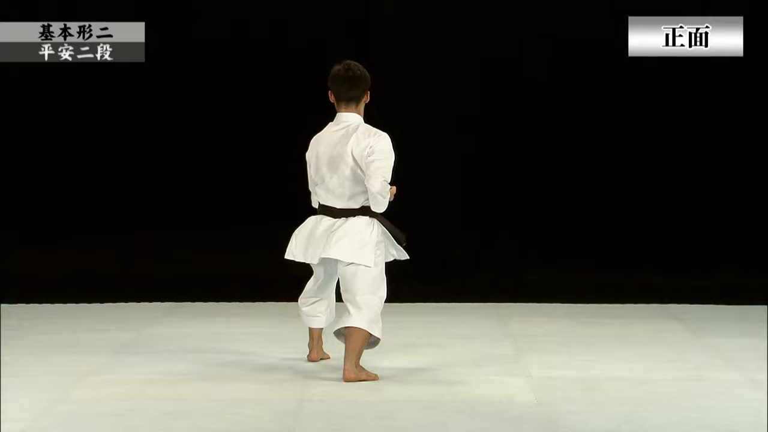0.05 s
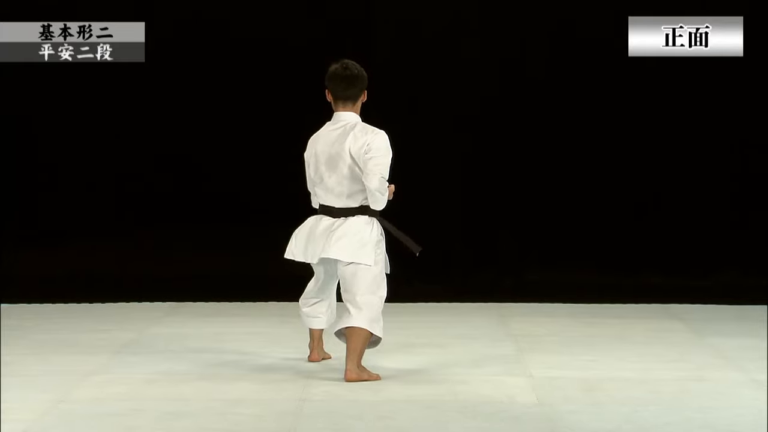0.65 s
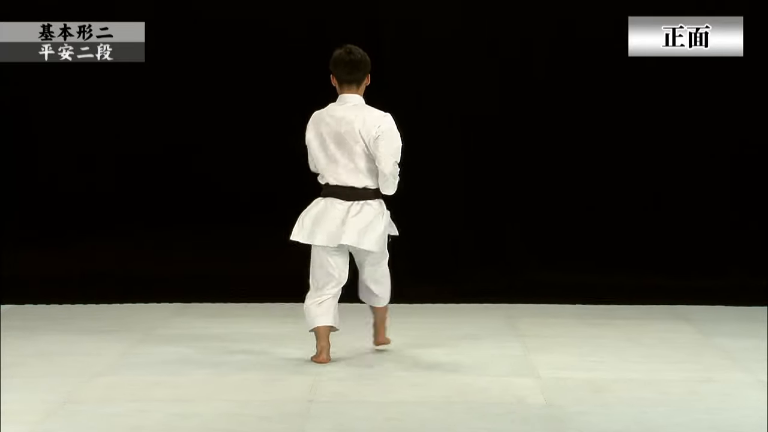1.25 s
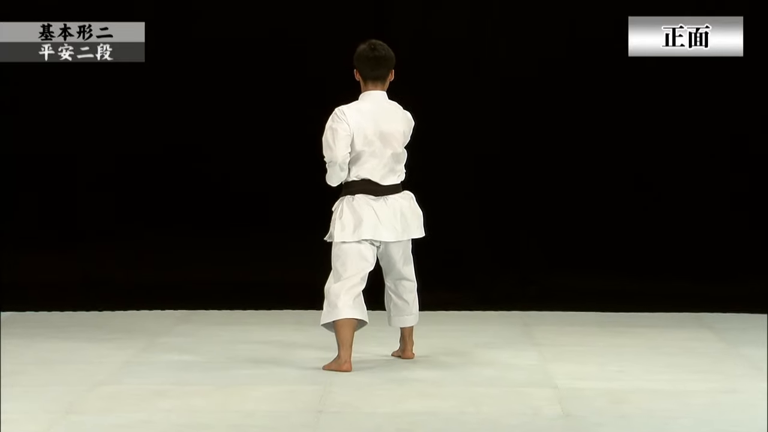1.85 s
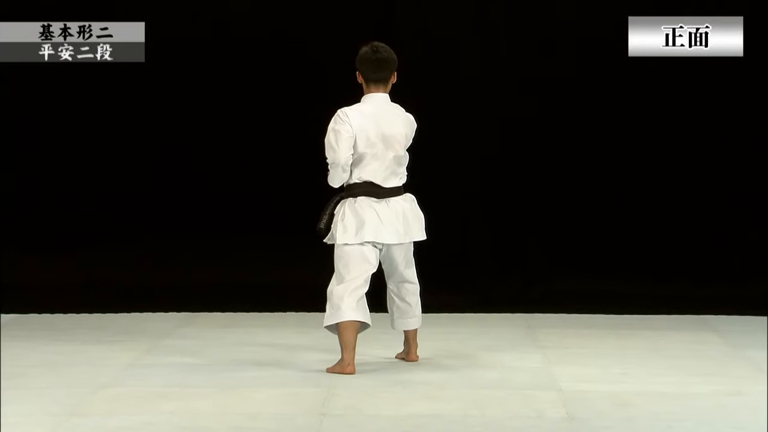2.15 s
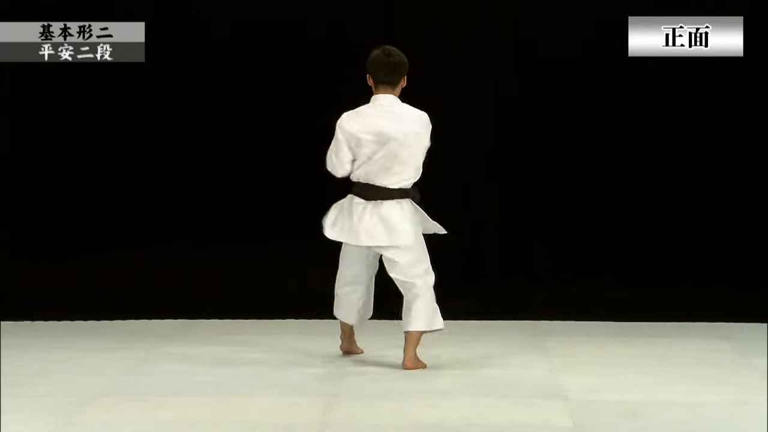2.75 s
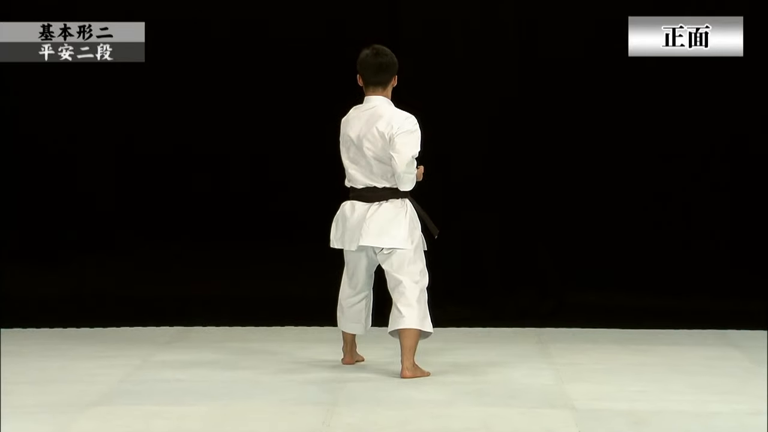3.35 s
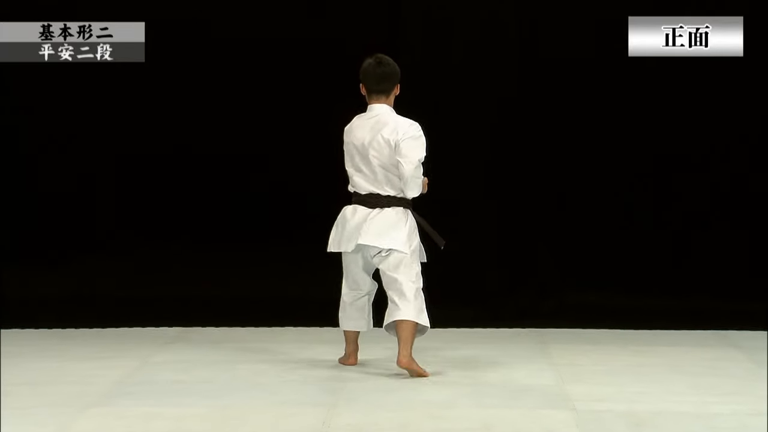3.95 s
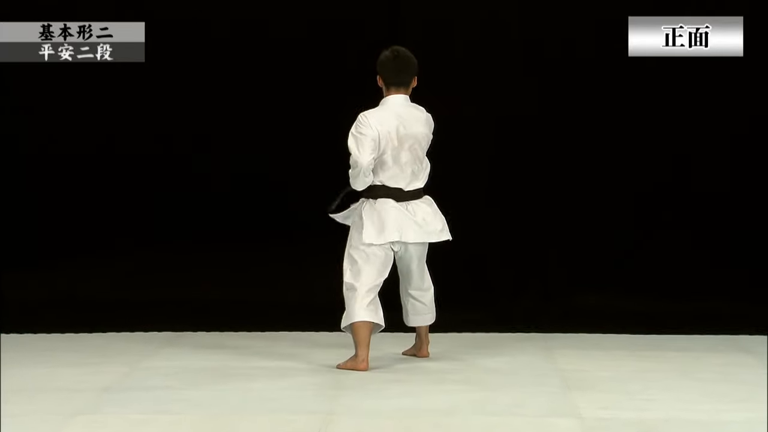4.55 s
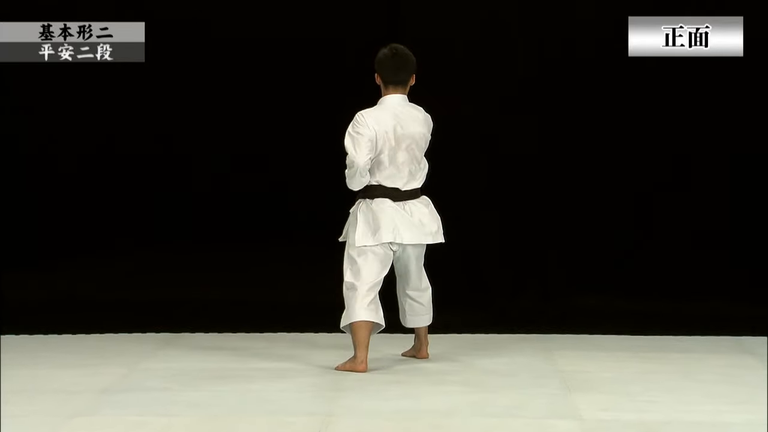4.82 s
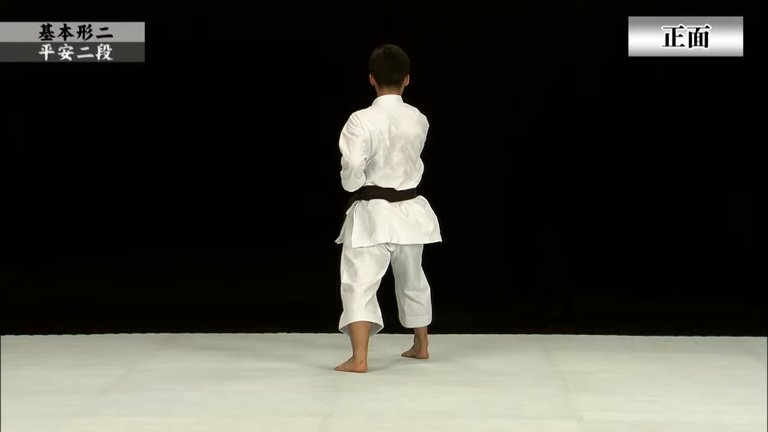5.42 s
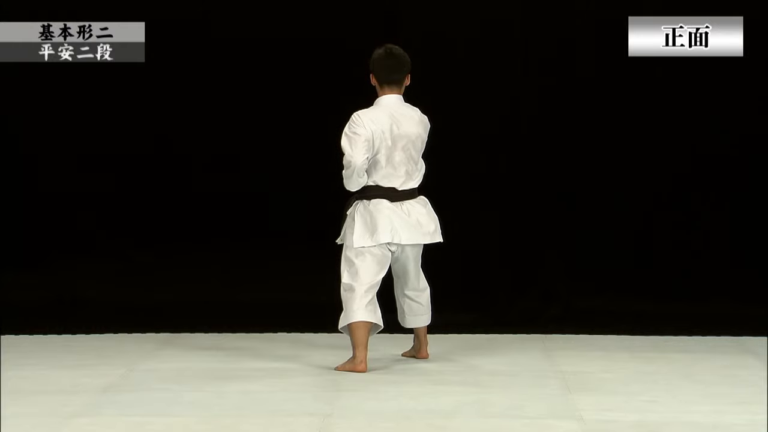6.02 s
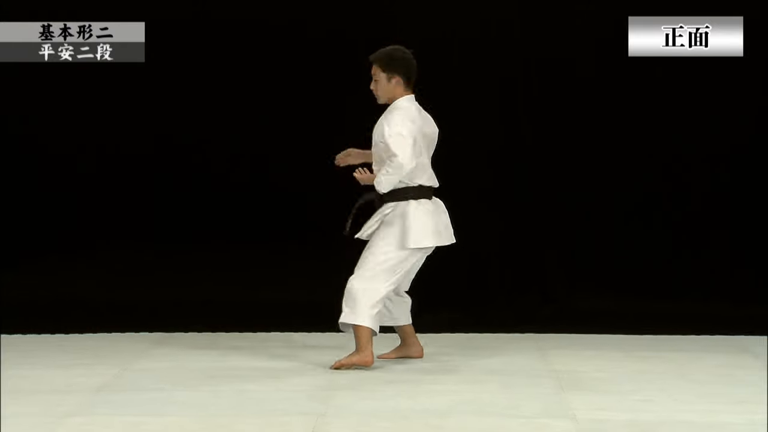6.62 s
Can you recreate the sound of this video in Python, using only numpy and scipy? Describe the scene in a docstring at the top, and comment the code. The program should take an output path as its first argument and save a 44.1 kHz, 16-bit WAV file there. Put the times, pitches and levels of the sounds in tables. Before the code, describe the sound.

A heavy cotton karate uniform swishes and snaps as bare feet step and thud on a padded mat in a quiet hall.

```python
"""A heavy cotton karate uniform swishes, flaps and cracks taut as its barefoot wearer steps and changes
stance three times, then starts a fourth move. Folds buckle in soft pops, the weave hisses as it rubs
and loose cloth flumps with trapped air. The soles thud, brush, squeak, slide and creak on a padded
floor that rings low. The quiet hall answers briefly; ventilation and a faint electrical hum fill
the pauses."""
import sys
import numpy as np
from scipy import signal
from scipy.fft import rfft, irfft, next_fast_len
from scipy.io import wavfile
from scipy.ndimage import map_coordinates

SR = 44100
rng = np.random.default_rng(int(sys.argv[2]) if len(sys.argv) > 2 else 0)


def to_wav(s):
    """Save 16-bit WAV."""
    ch = np.atleast_2d(s).T  # columns
    pcm = np.round(np.clip(ch, -1, 1) * 32767)  # PCM
    wavfile.write(sys.argv[1], SR, pcm.astype(np.int16))


N = 294588

# tone colour of a fold cracking taut: f/multiple of the fold's pitch, level/dB
CRACK_SPECTRUM = [(.04, -36), (.12, -8), (.35, -9.5), (.7, 4), (1, 5.5), (1.4, -2.5), (2.2, -10), (4, -23),
                  (9, -34), (20, -44.5)]


def amp(db):
    """Decibels to gain."""
    return np.exp(np.asarray(db) * (np.log(10) / 20))


def unit(x):
    """Scale to rms 1."""
    return x / np.sqrt(np.mean(x ** 2) + 1e-20)


def along(points, hz):
    """Read (f/Hz, value) points on a log frequency axis."""
    f, v = np.transpose(points)
    return np.interp(np.log(hz + 1), np.log(f + 1), v)


def stroke(rows):
    """Cycles elapsed and gain of a short gliding contact, silent outside its span."""
    times, hz, db = np.transpose(rows)
    t = np.arange(N) / SR
    touching = (t > times[0]) & (t < times[-1])
    cycles = np.cumsum(np.interp(t, times, hz) * touching) / SR
    return cycles, amp(np.interp(t, times, db)) * touching


def wobble(rate):
    """A smooth random curve, rate knots a second."""
    knots = rng.standard_normal(int(N * rate / SR) + 4)
    return map_coordinates(knots, [np.arange(N) * rate / SR])


def coloured(x, spectrum, size=8192):
    """x through a causal filter of unit energy with the given spectrum."""
    cepstrum = irfft(np.log(amp(along(spectrum, np.fft.rfftfreq(size, 1 / SR)))))
    cepstrum[1:size // 2] *= 2  # minimum phase keeps attacks sharp
    cepstrum[size // 2 + 1:] = 0
    response = irfft(np.exp(rfft(cepstrum)))
    return signal.fftconvolve(x, response / np.linalg.norm(response))[:N]


def noise(spectrum):
    """Coloured noise of rms 1."""
    return unit(coloured(rng.standard_normal(N), spectrum))


def grains(rate, spread_db):
    """Random tiny impulses of uneven size, rms 1."""
    chance, size = rng.random(N), rng.standard_normal(N)
    impulses = (chance < rate / SR) * rng.choice([-1, 1], N)
    return unit(impulses * amp(spread_db * np.clip(size, -2, 2)))


def puff(spectrum, t60, size=4096):
    """A dying burst of coloured noise that starts at about rms 1."""
    t = np.arange(size) / SR
    colour = amp(along(spectrum, np.fft.rfftfreq(size, 1 / SR)))
    fall = amp(-60 * t / t60)
    burst = irfft(rfft(rng.standard_normal(size)) * colour) * fall
    return burst * np.linalg.norm(fall) / np.linalg.norm(burst)


def gesture(start, length, rise, grow, fall):
    """Envelope of one motion: it rises, grows to 1 at its end and falls, all slopes in dB a second."""
    t = np.arange(N) / SR - start
    attack_db = -rise * np.maximum(-t, 0) - grow * np.maximum(length - t, 0)
    return amp(attack_db - fall * np.maximum(t - length, 0))


def add(track, s, sound):
    """Mix a sound in at time s."""
    part = track[round(s * SR):][:len(sound)]
    part += sound[:len(part)]


def room_tone():
    """The bed: ventilation noise, a slightly unsteady electrical hum and thin, fluttering whines."""
    # ventilation air: f/Hz, level/dB
    air_spectrum = [(20, -12.5), (45, -3), (88, -2.5), (125, -8.5), (200, -8.5), (300, -12.5), (500, -17.5),
                    (900, -21), (2000, -24.5), (3300, -25.5), (6000, -29), (15000, -27.5)]
    # hum tones: f/Hz, rms level/dB
    hum_tones = [(91.5, -64.5), (150.7, -72.5), (193.8, -70), (398.4, -74), (500.6, -71.5), (699.8, -75)]
    # electrical whines: f/Hz, width/Hz, rms level/dB
    whine_bands = [(3307, 33, -77.5), (4846, 24, -75.5), (4895, 14, -77)]
    t = np.arange(N) / SR
    hum, whine = np.zeros((2, N))
    for hz, db in hum_tones:
        hum += amp(db) * np.sqrt(2) * np.sin(2 * np.pi * hz * t + 0.89 * wobble(8.3))
    for hz, width, db in whine_bands:
        band = signal.butter(2, [hz - width / 2, hz + width / 2], "bandpass", fs=SR, output="sos")
        whine += amp(db) * unit(signal.sosfilt(band, rng.standard_normal(N)))
    return amp(-59) * noise(air_spectrum) + hum + whine


def thrusts():
    """Flap, rub and floor-load envelopes as hips and arms drive into a stance, lock and settle."""
    # drives into a stance: t/s, length/s, cloth level at the lock/dB, floor load/dB
    drives = [(-.2, 0.15, -29, -30.5), (1.359, .17, -27.5, -28), (2.838, 0.084, -20.5, -22),
              (4.34, 0.14, -26, -26), (6.658, 0.12, -29.5, -25)]
    rise, grow = 499.5, 25  # dB/s
    flap, rub, load = np.zeros((3, N))
    for s, length, db, load_db in drives:
        drive = gesture(s, length, rise, grow, fall=181.5)
        settle = amp(db - 27) * gesture(s, length, rise, grow, fall=41)
        sway = gesture(s, length, rise, grow, fall=90.5)
        rub_db = -30 + 0.52 * db  # a harder thrust adds more flap than rub
        flap += (amp(db) * drive) ** 2 + settle ** 2
        rub += (amp(rub_db) * drive) ** 2 + (amp(-2.5) * settle) ** 2
        load += (amp(load_db) * sway) ** 2
    return np.sqrt([flap, rub, load])


def cloth_rustle(flap_db, rub_db):
    """Folds buckle in dense soft pops while the weave rubs with a finer hiss."""
    # dull body of flapping cotton: f/Hz, level/dB
    flap_spectrum = [(88, -27), (150, 0), (343, -5.5), (661, -4.5), (818, -8.5), (972, -9), (1540, -14.5),
                     (1800, -13.5), (1980, -18.5), (2970, -20), (3540, -25.5), (5000, -26), (15000, -49.5)]
    # hiss of weave on weave: f/Hz, level/dB
    rub_spectrum = [(1180, -20.5), (2000, -5.5), (3320, -7.5), (4930, -9), (8550, -12), (15100, -22),
                    (15600, -23.5)]
    flutter_db = wobble(70)
    folds = coloured(grains(rate=900, spread_db=2.5), flap_spectrum)
    flapping = amp(-4) * folds + amp(-6) * noise(flap_spectrum)
    rubbing = coloured(grains(rate=9000, spread_db=4.5), rub_spectrum)
    return amp(flap_db + flutter_db) * flapping + amp(rub_db - 3 + 1.27 * flutter_db) * rubbing


def floor_thuds(load_db):
    """Steps ring the floor, soft ones mostly in its lowest mode; shifting weight keeps it rumbling."""
    # modes of the padded floor: f/Hz, level/dB, t60/s
    mat_modes = [(85.6, -3.5, 0.15), (118.2, -2, 0.24), (146, -11.5, 0.051)]
    # footfalls: t/s, level/dB, softness/dB lost per higher mode
    footfalls = [(0.72, -35, 3), (1.073, -23, 17), (1.107, -22, 20), (1.384, -17.5, 7), (1.453, -16.5, 7.5),
                 (2.205, -43, -3.5), (2.378, -35, 4.5), (2.513, -31, 1), (2.573, -29, -1), (2.811, -4, 0.5),
                 (2.871, -14.5, 0), (4.32, -22.5, -1), (4.352, -14.5, 1), (4.383, -22.5, -3.5),
                 (6.506, -42, -2), (6.664, -18, -1)]
    # floor rumble under shifting weight: f/Hz, level/dB
    rumble_spectrum = [(20, -40), (40, -12), (55, -1.5), (85, 2.5), (120, -3.5), (170, -11), (260, -27),
                       (500, -56), (1500, -95.5)]
    thuds, t = np.zeros(N), np.arange(SR // 2) / SR
    modes = np.array([(-1) ** k * amp(db - 60 * t / t60) * np.sin(2 * np.pi * hz * t)
                      for k, (hz, db, t60) in enumerate(mat_modes)])
    modes *= 1 - np.exp(-t / 0.002)  # the padding softens the blow
    for s, db, soft_db in footfalls:
        add(thuds, s, amp(db - soft_db * np.arange(len(modes))) @ modes)
    sway = amp(load_db - 3)
    sway /= np.hypot(1, sway / amp(-23.5))  # the mat gives only so far
    return thuds + sway * noise(rumble_spectrum)


def cloth_snaps():
    """Cloth draws taut over a moment; a smaller, tighter fold cracks higher and brighter."""
    # folds pulling taut: t/s, relative level/dB, t60/s, pitch/Hz
    taut_folds = [(.72, -42.5, 0.016, 1520), (.765, -44, 0.043, 890), (.992, -36.5, 0.026, 680),
                  (1.168, -33, 0.11, 700), (1.187, -23, 0.055, 724), (1.211, -35, 0.045, 900),
                  (1.374, -25.5, 0.028, 840), (1.449, -27, 0.08, 695), (1.497, -18.5, 0.11, 690),
                  (1.524, -24.5, 0.11, 940), (1.797, -45, 0.025, 1020), (1.882, -45, 0.044, 614),
                  (2.528, -29.5, .026, 1830), (2.667, -24, 0.035, 1070), (2.777, -28.5, 0.074, 740),
                  (2.862, -12.5, 0.024, 1590), (2.877, -10, 0.067, 1394), (2.906, -10, 0.032, 1150),
                  (2.926, -15, 0.033, 1085), (3.229, -45.5, .064, 1050), (3.918, -38, .03, 895),
                  (4.109, -29.5, .017, 1390), (4.128, -25.5, 0.026, 710), (4.178, -29.5, 0.015, 1060),
                  (4.287, -29.5, 0.026, 700), (4.342, -22, 0.025, 500), (4.4546, -11, 0.013, 1390),
                  (4.4577, -13, 0.035, 1002), (4.484, -20.5, .094, 930), (4.636, -27.5, 0.024, 890),
                  (6.122, -45.5, 0.053, 550), (6.505, -40, 0.016, 1510)]
    out = np.zeros(N)
    for s, db, t60, hz in taut_folds:
        crack = puff(np.array(CRACK_SPECTRUM) * [hz, 1], t60)
        attack_s = 0.011 * t60  # slack folds tighten more slowly
        swell = 1 - np.exp(-np.arange(len(crack)) / SR / attack_s)
        add(out, s, amp(db - 1) * crack * swell)
    return out


def strides():
    """Flap, rub and floor-load envelopes as the body leans and a leg swings through."""
    # leg swings: t/s, lean before it/s, lean level/dB, length/s, flap level/dB, rub level/dB
    swings = [(1.065, .33, -49.5, 0.51, -41.5, -47.5), (2.533, 0.37, -53, 0.26, -36.5, -45.5),
              (4.004, .19, -52, 0.39, -42, -49.5), (6.512, 0.1, -59.5, .16, -49.5, -47)]
    rise, fall = 334, 198  # dB/s
    flap, rub, load = np.zeros((3, N))
    for s, lean_s, lean_db, length, flap_db, rub_db in swings:
        lean = amp(lean_db) * gesture(s - lean_s, lean_s, rise, grow=25, fall=fall)
        swing = gesture(s, length, rise, grow=0, fall=fall)
        flap += lean ** 2 + (amp(flap_db) * swing) ** 2
        rub += (amp(-2.5) * lean) ** 2 + (amp(rub_db) * swing) ** 2
        load += (amp(7) * lean) ** 2 + (amp(flap_db + 0.5) * swing) ** 2
    return np.sqrt([flap, rub, load])


def cloth_creases(leg_flap, count=130, per_second=19, centre_hz=798):
    """Small folds catch at uneven moments, as loud as the leg's motion makes them."""
    out = np.zeros(N)
    for k, (jitter, size, detune) in enumerate(rng.uniform(-1, 1, (count, 3))):
        s = (k + 1 + jitter) / per_second
        hz = centre_hz * 2 ** (0.5 * detune)
        crack = puff(np.array(CRACK_SPECTRUM) * [hz, 1], t60=0.019)
        add(out, s, amp(4 + 0.5 * size) * crack)
    return leg_flap * out


def slaps():
    """Skin and hems strike with a short bright tick."""
    # tone colour of a slap: f/Hz, level/dB
    slap_spectrum = [(40, -39), (200, -7), (900, -4.5), (2800, 4), (5000, -5), (8000, -15.5),
                     (11000, -22.5), (15000, -33)]
    # skin and hem hits: t/s, level/dB, t60/s
    hits = [(1.063, -39, .0073), (2.217, -43, .009), (2.569, -31, 0.01), (2.618, -32.5, 0.0086),
            (2.661, -33, 0.014), (2.8131, -17.5, .008), (2.926, -18, .008), (2.93, -15, 0.0082),
            (3.229, -46, 0.013), (3.895, -35, .0082), (4.458, -16.5, .008), (6.122, -54.5, .01),
            (6.649, -23.5, 0.0079), (6.6604, -20, 0.0068), (6.67, -18.5, 0.0033)]
    out = np.zeros(N)
    for s, db, t60 in hits:
        add(out, s, amp(db) * puff(slap_spectrum, t60))
    return out


def sole_brush():
    """A skimming sole hisses more as it speeds up, then stops."""
    # hiss of skin on the mat: f/Hz, level/dB
    scuff_spectrum = [(300, -36.5), (2000, -5), (5000, 0), (9000, -0.5), (12000, -6.5), (15500, -8)]
    # skims: t at the fastest/s, level/dB, swell/s, stop/s
    skims = [(1.075, -47.5, .02, 0.015), (1.21, -47.5, .02, 0.021), (2.372, -54.5, .004, 0.0074),
             (2.541, -48.5, .015, 0.018), (2.612, -40, .033, 0.016), (2.667, -41, .01, 0.0064),
             (4.102, -45.5, .025, .01), (4.398, -40, .03, .014)]
    t, speed = np.arange(N) / SR, np.zeros(N)
    for s, db, swell, stop in skims:
        width = np.where(t < s, swell, stop)
        speed += amp(db) * np.exp(-0.5 * ((t - s) / width) ** 2)
    roughness = amp(1.9 * wobble(300))
    return speed * roughness * noise(scuff_spectrum)


def cloth_billows(attack_s=0.0014):
    """Loose cloth traps air with a soft, low flump."""
    # trouser legs and jacket skirts filling with air: t/s, level/dB, t60/s, pitch/Hz
    air_pockets = [(1.376, -16.5, 0.024, 296), (1.451, -26, 0.053, 380), (1.5, -22, 0.12, 278),
                   (2.818, -15.5, 0.057, 330), (2.872, -14.5, 0.068, 229), (4.033, -30, 0.11, 450),
                   (4.354, -25, 0.073, 280), (4.456, -22, .056, 330), (6.636, -32.5, .03, 397),
                   (6.655, -26.5, 0.071, 380), (6.665, -24, 0.08, 396)]
    out = np.zeros(N)
    for s, db, t60, hz in air_pockets:
        spectrum = [(hz / 5, -30), (hz * 0.37, -5), (hz, 0),
                    (hz * 1.6, -8), (hz * 5, -40), (hz * 20, -80)]
        flump = puff(spectrum, t60)
        swell = 1 - np.exp(-np.arange(len(flump)) / SR / attack_s)
        add(out, s, amp(db) * flump * swell)
    return out


def sole_squeak():
    """Skin twisting on the mat gives a low rising note."""
    # glide of the twisting sole: t/s, f/Hz, level/dB
    twist = [(2.445, 130, -50), (2.468, 180, -33.5), (2.481, 245, -33), (2.49, 330, -35),
             (2.507, 390, -37.5), (2.516, 410, -53.5)]
    cycles, gain = stroke(twist)
    phase = 2 * np.pi * cycles
    note = np.sin(phase) + amp(-13) * np.sin(2 * phase)
    return gain * amp(1.7 * wobble(81)) * note


def sole_slide():
    """The mat's fine ribs whistle as two parts of the foot judder across them at different speeds."""
    # whistle under the faster part of the foot: t/s, f/Hz, level/dB
    whistle = [(2.582, 7860, -45.5), (2.594, 8320, -46.5), (2.607, 9300, -34.5), (2.618, 10500, -37.5),
               (2.645, 12680, -48.5)]
    cycles, gain = stroke(whistle)
    fast = np.sin(2 * np.pi * cycles + 1.2 * wobble(1100))
    slow = np.sin(2 * np.pi * 0.62 * cycles + 1.2 * wobble(1100))
    return gain * (fast + amp(-7) * slow)


def sole_creak(jitter_cycles=0.11):
    """A peeling sole sticks and slips; every slip is a sharp click with a small knock in the mat."""
    # the sole peeling off: t/s, slip rate/Hz, relative level/dB
    peel = [(3.981, 262, -44.5), (3.997, 270, -29), (4.012, 288, -25), (4.021, 270, -15), (4.032, 250, -23),
            (4.045, 267, -20.5), (4.053, 310, -26)]
    click_spectrum = [(100, -25.5), (270, 4.5), (900, 6), (1800, -3.5),
                      (4500, 1), (7500, -8), (11000, -14.5), (15000, -29)]
    cycles, gain = stroke(peel)
    slips = np.diff(np.floor(cycles + jitter_cycles * wobble(250)), prepend=0)
    strength = gain * amp(1.46 * rng.standard_normal(N))
    return amp(8) * coloured(-slips * strength, click_spectrum)


def hall(x):
    """The hall's short reverb, each frequency dying at its own speed."""
    # reverb decay: f/Hz, t60/s
    decay_times = [(80, 0.6), (130, 0.49), (300, 0.33), (1500, 0.49), (5000, 0.23), (14000, 0.18)]
    hz, t, bands = signal.stft(rng.standard_normal(SR), SR, nperseg=256)
    decay = amp(-60 * t / along(decay_times, hz)[:, None])
    tail = signal.istft(bands * decay, SR, nperseg=256)[1]
    predelayed = np.pad(x, (SR // 100, 0))  # 10 ms
    return signal.fftconvolve(predelayed, tail / np.linalg.norm(tail))[:N]


def scene():
    """Strides and thrusts drive cloth and floor; with the soles they sound in the hall, in mono."""
    legs = strides()
    flap_db, rub_db, load_db = 20 * np.log10(np.hypot(legs, thrusts()) + 1e-9)
    cloth = cloth_rustle(flap_db, rub_db) + cloth_creases(legs[0]) + cloth_snaps() + cloth_billows()
    soles = slaps() + sole_brush() + sole_creak() + sole_squeak() + sole_slide()
    direct = cloth + soles + floor_thuds(load_db)
    return (direct + amp(-14) * hall(direct) + room_tone())[None]


def record(dry):
    """A low cut thins the deepest bass; a brick-wall high cut removes the very top."""
    low_cut_hz, high_cut_hz = 46, 15800
    thinned = signal.sosfilt(signal.butter(3, low_cut_hz, "highpass", fs=SR, output="sos"), dry)
    size = next_fast_len(N + SR // 2)
    passband = np.fft.rfftfreq(size, 1 / SR) < high_cut_hz
    return irfft(rfft(thinned, size) * passband, size)[:, :N]


dry = scene()
out = record(dry)
to_wav(out)
```